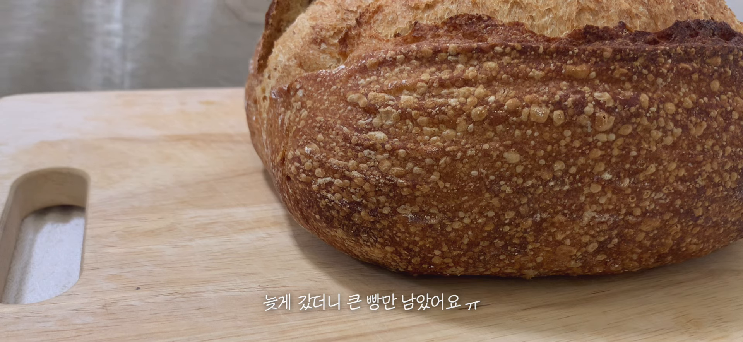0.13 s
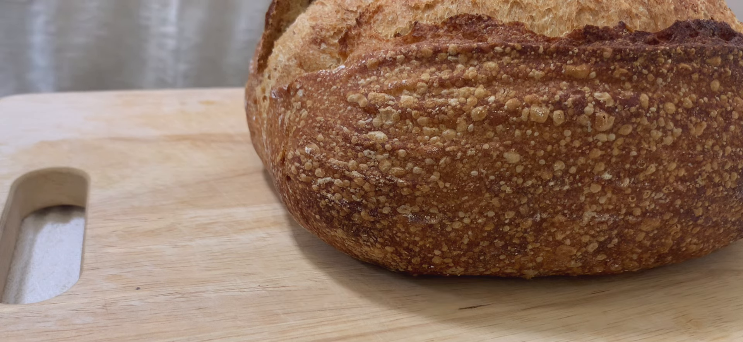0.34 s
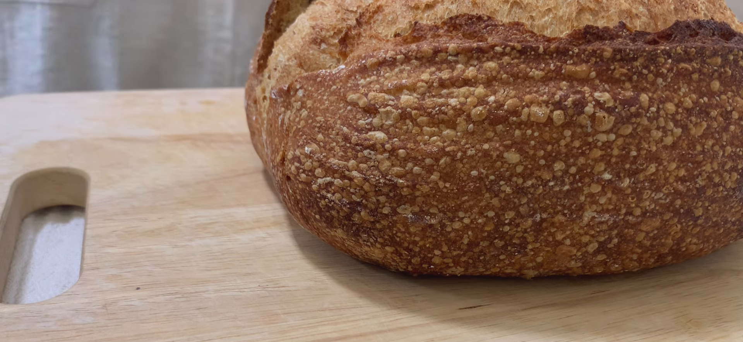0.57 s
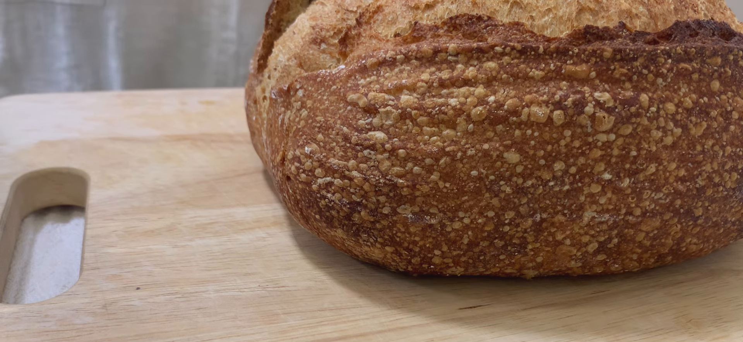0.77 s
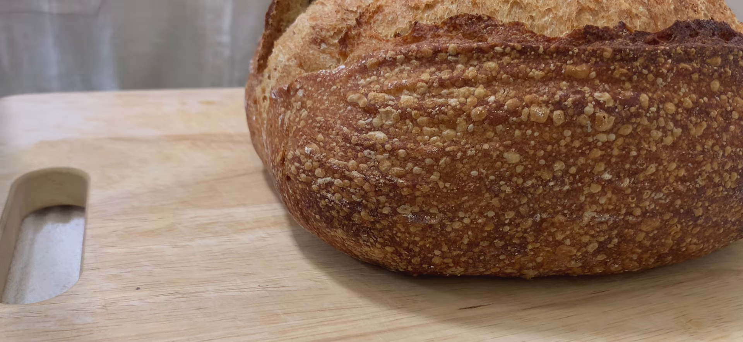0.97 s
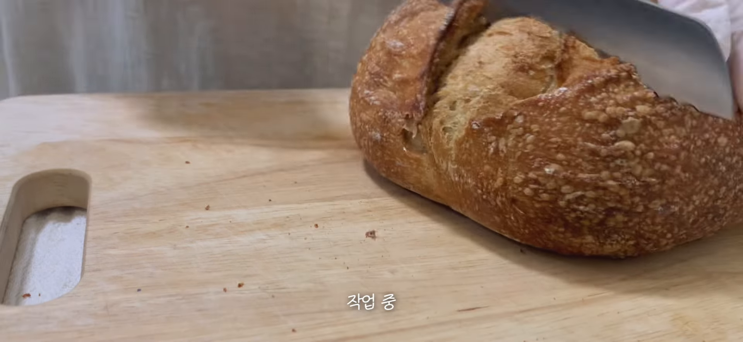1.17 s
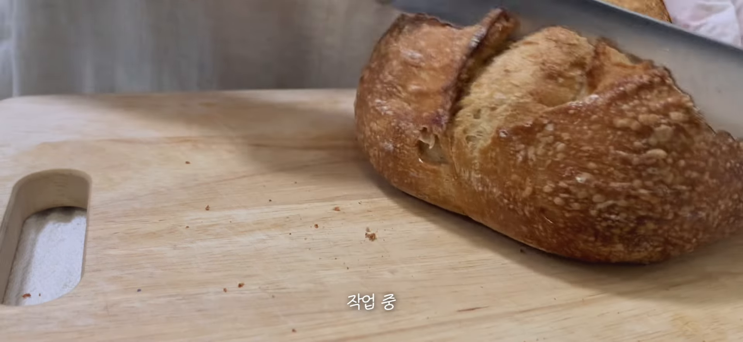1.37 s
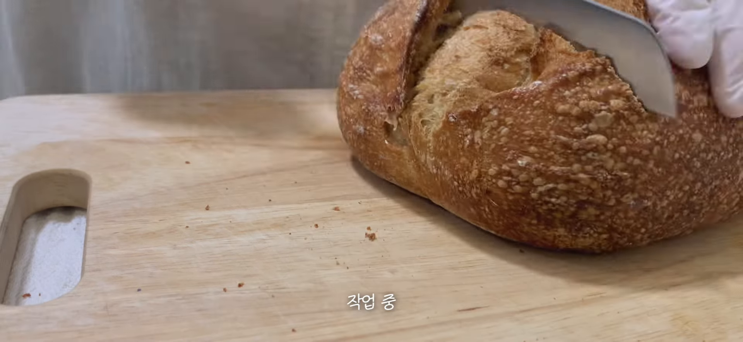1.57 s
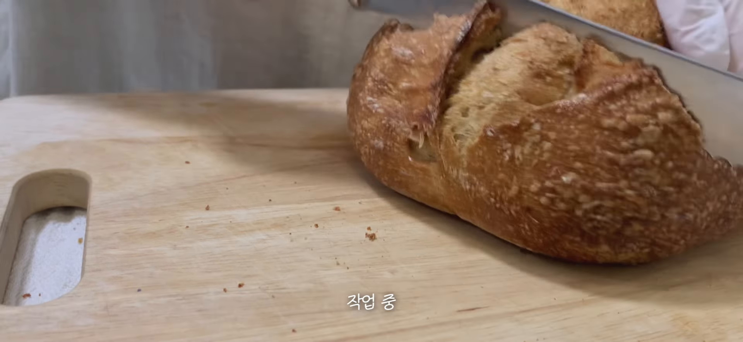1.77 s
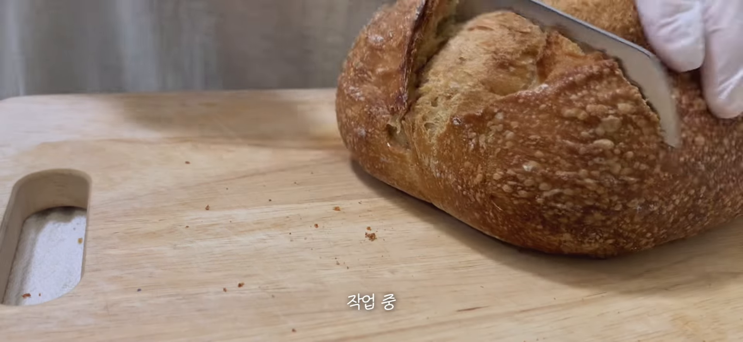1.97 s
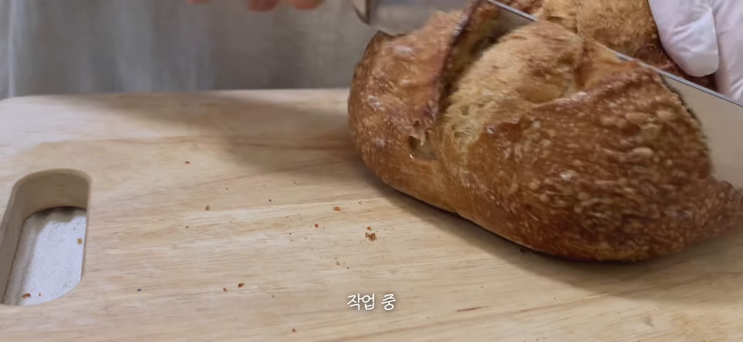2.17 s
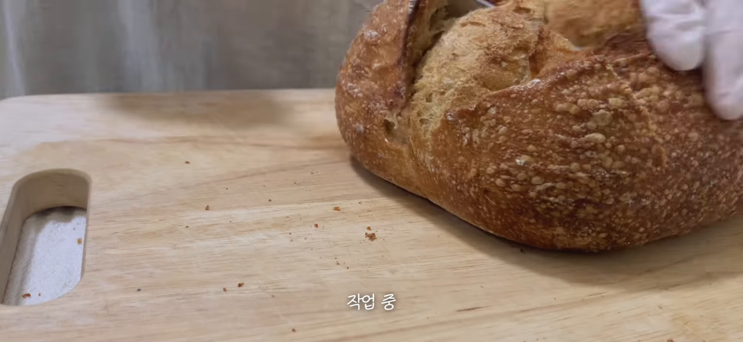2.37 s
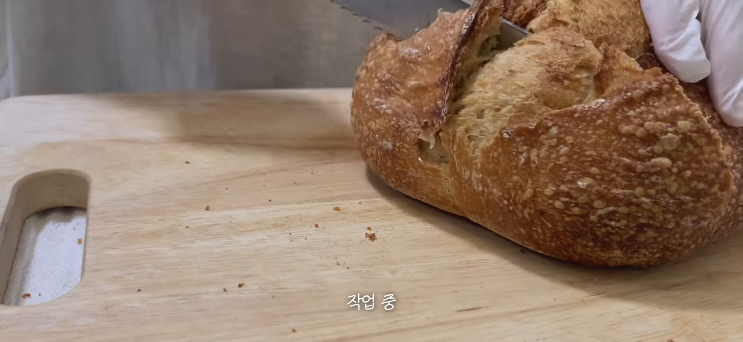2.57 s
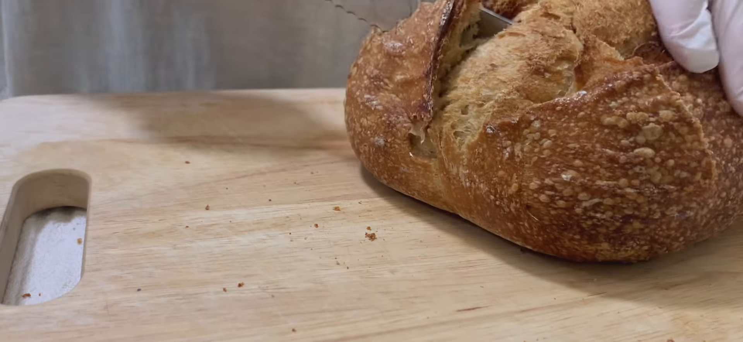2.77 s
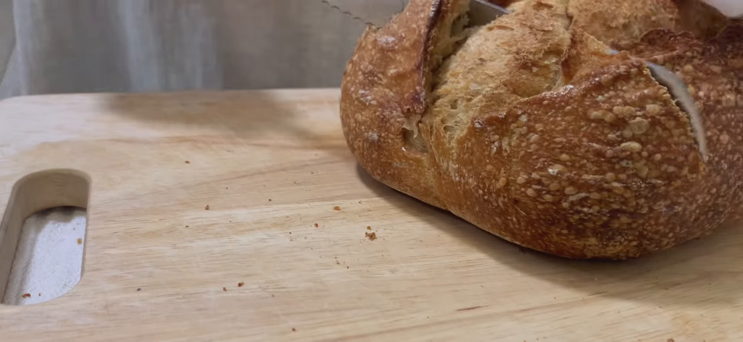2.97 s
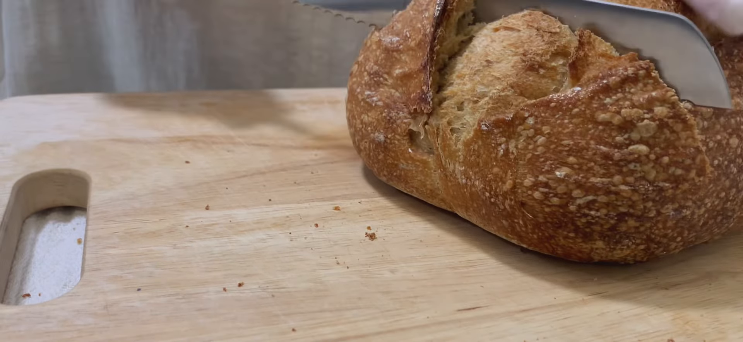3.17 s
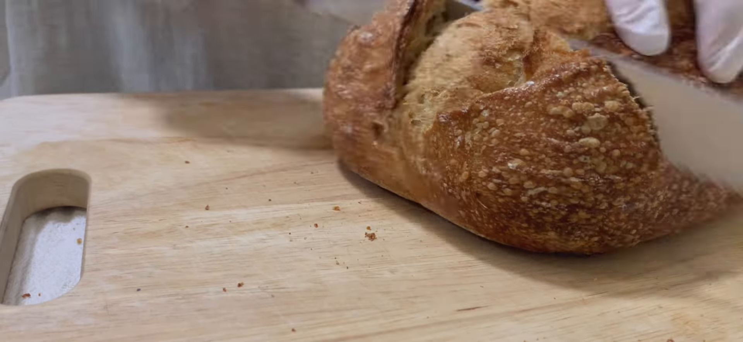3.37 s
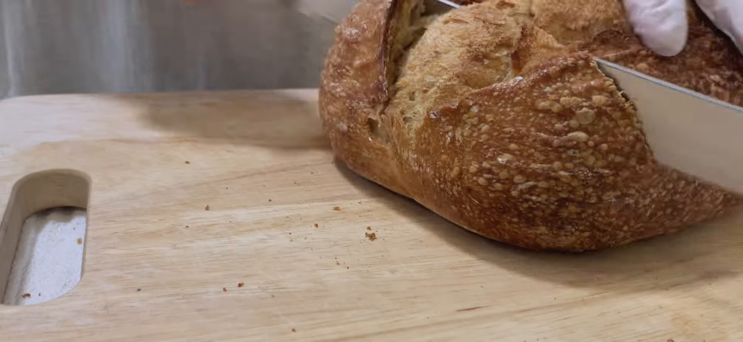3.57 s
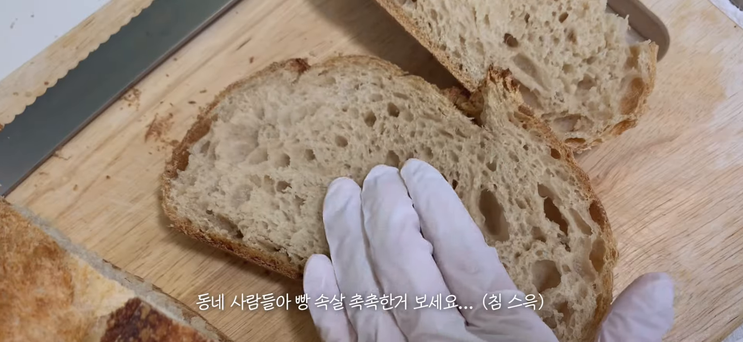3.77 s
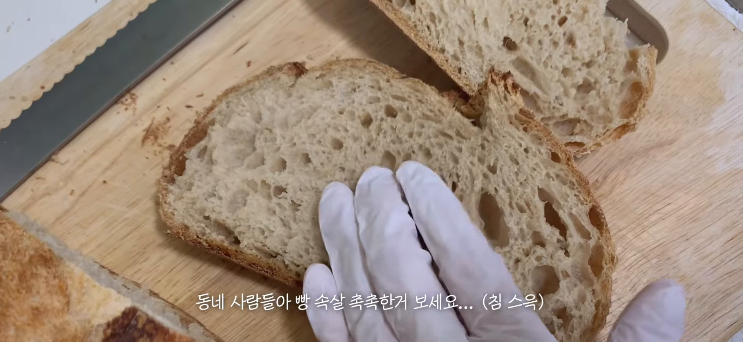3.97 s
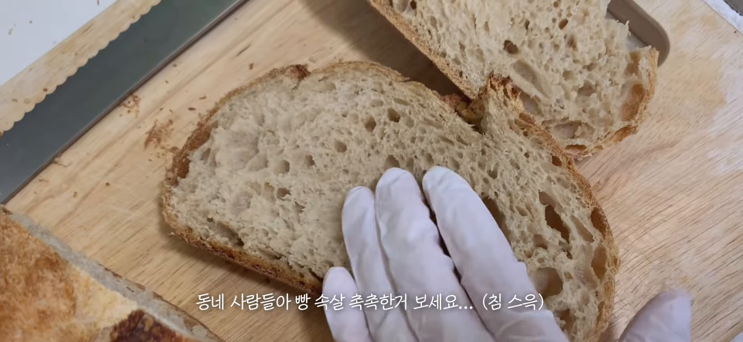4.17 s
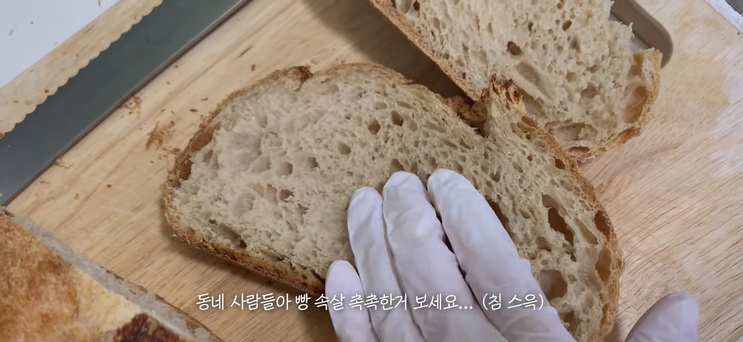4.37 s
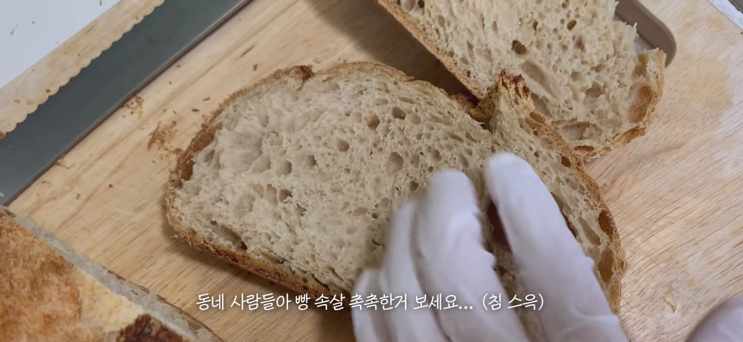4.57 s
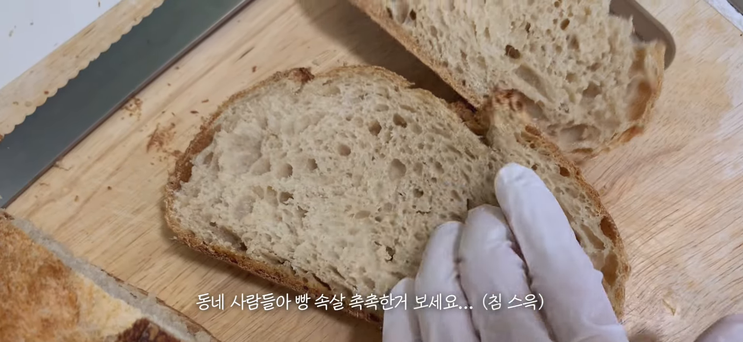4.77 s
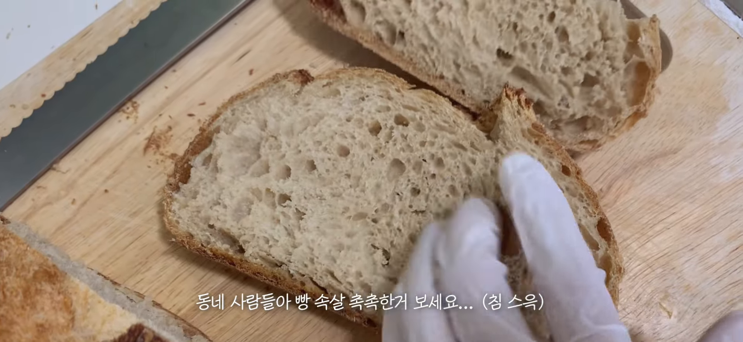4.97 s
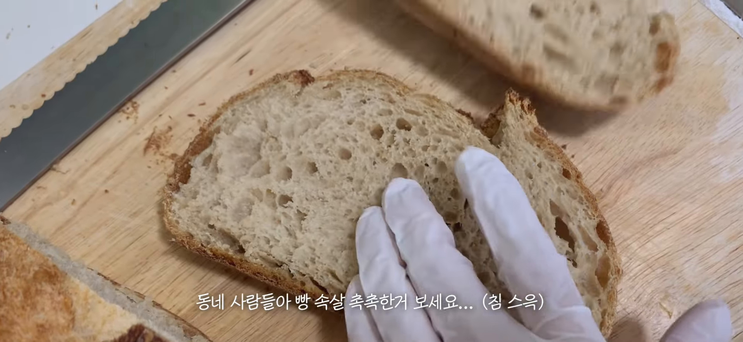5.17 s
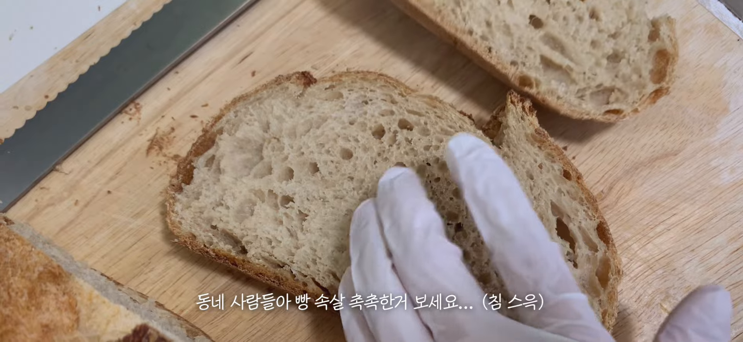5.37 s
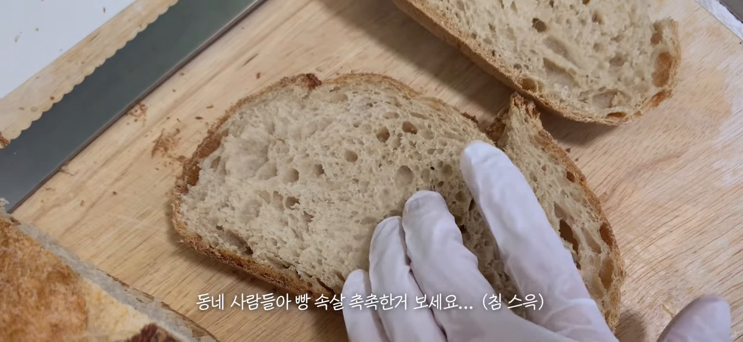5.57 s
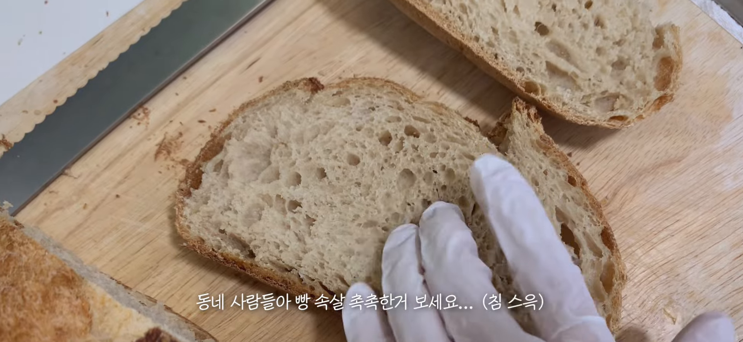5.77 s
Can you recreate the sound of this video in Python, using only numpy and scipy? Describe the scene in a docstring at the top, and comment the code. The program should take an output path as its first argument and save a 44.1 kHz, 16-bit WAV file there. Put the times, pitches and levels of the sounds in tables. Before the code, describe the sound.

A serrated knife saws rapidly through a crackly bread crust on a booming wooden board, then a gloved hand rubs, crackles and taps softly.

```python
"""In a kitchen, a serrated knife saws a hard loaf on a wooden board, close to a two-port phone microphone.
Grainy noise makes the crust's rasp and fizz, noise the board's boom, swelling sines its shudder when teeth catch.
Duller noise strokes come first from farther off; later a gloved hand presses the slice, with rubbing noise,
snaps of short noise bursts and finger taps through board resonances. Low noise rumbles throughout."""
import sys
import numpy as np
from scipy import signal
from scipy.fft import rfft, irfft, next_fast_len
from scipy.io import wavfile
from scipy.ndimage import uniform_filter1d

SR = 44100
rng = np.random.default_rng(int(sys.argv[2]) if len(sys.argv) > 2 else 0)


def put_to_file(sound):
    """Save the sound as 16-bit audio at rate SR, in the file named by the first command-line argument."""
    columns = np.atleast_2d(sound).T  # one column per channel
    safe = np.clip(columns, -1, 1)
    whole_steps = np.round(safe * 32767)
    wavfile.write(sys.argv[1], SR, whole_steps.astype(np.int16))


N = 256662

# strokes of the blade: (start [s], length [s], hardest point [0-1 of the stroke], brightest point [0-1],
# peakiness [factor on the power of speed], rasp [dB], fizz over rasp [dB], wood [dB], boom [dB])
STROKES = [(.98, .288, .12, .28, 1.72, -41.5, -4.5, -30, -29),
           (1.155, .284, .31, .33, 1.6, -40.5, -1.5, -25, -26),
           (1.368, .235, .5, .16, 1.68, -38.5, 2.5, -31.5, -32),
           (1.559, .258, .29, .23, .92, -41, -1, -29, -26), (1.777, .21, .4, .17, .9, -45, 3, -34, -34),
           (1.935, .286, .4, .44, 1.61, -41, 0, -29, -33), (2.164, .287, .3, .1, 1.32, -46, 4.5, -35, -34),
           (2.365, .226, .37, .44, 2.5, -45.5, 5, -53, -38), (2.5, .141, .52, .45, 2.5, -55.5, 1, -62, -46),
           (2.644, .129, .23, .26, 2.5, -57, -2.5, -64, -48),
           (2.7, .19, .9, .44, 1.07, -82.5, 15, -72, -52), (2.804, .183, .86, .43, 2.5, -66, 13, -72, -50),
           (2.91, .204, .9, .44, .94, -57, .5, -51, -40), (3.078, .22, .1, .35, 1.15, -60, 0, -53, -40),
           (3.22, .181, .77, .77, 2.5, -40, .5, -39, -34), (3.359, .17, .1, .23, 1.24, -44, -2.5, -39, -37),
           (3.476, .25, .53, .19, 1.49, -48, 6.5, -38.5, -37)]
# the close sawing is heard only between these times, breaking in and off mid-stroke: (start [s], end [s])
CLOSE_SAWING = (1.043, 3.662)
# soft rasp of glove, snap bodies and far strokes: (frequency [Hz], level per Hz [dB])
SOFT_RASP = [(400, -18), (900, -1.5), (1400, -1), (2300, -4.5), (3200, -10.5), (5000, -11), (8000, -49)]
# fizz of the glove, top of the snaps: (frequency [Hz], level per Hz [dB])
RUBBER_FIZZ = [(3000, -63), (5000, -12), (7000, -4), (9000, -6), (12000, -8.5), (16000, -22)]


def amp(db):
    """Amplitude factor of a level in dB."""
    return 10 ** (np.asarray(db) / 20)


def unit(x):
    """x scaled to an rms of 1."""
    return x / np.sqrt(np.mean(x ** 2) + 1e-20)


def along(points, hz):
    """Curve through (Hz, value) points on a log frequency axis."""
    f, v = np.transpose(points)
    return np.interp(np.log(hz + 1), np.log(f + 1), v)


def filtered(x, response):
    """x shaped by a complex response of frequency."""
    m = next_fast_len(N + 8192)
    return irfft(rfft(x, m) * response(np.fft.rfftfreq(m, 1 / SR)), m)[..., :N]


def modes(table):
    """Causal response of (Hz, width Hz, dB) resonances, summed with alternating sign."""
    def response(f):
        total = 0
        for k, (center, width, db) in enumerate(table):
            resonance = 1j * f * width / (center * center - f * f + 1j * f * width)
            total = total + (-1) ** k * amp(db) * resonance
        return total
    return response


def noise(spectrum, grain=1, patchy_db=0):
    """Two unrelated noises of joint rms 1 that share one grain envelope and patches of random gain."""
    z = signal.stft(grain * rng.standard_normal((2, N)), nperseg=512)[2]
    # smooth the random gains over frequency, then time
    field = uniform_filter1d(rng.standard_normal(z.shape[1:]), size=2, axis=0)
    field = uniform_filter1d(field, size=5, axis=1)
    pair = signal.istft(z * amp(patchy_db * unit(field)), nperseg=512)[1][:, :N]
    return unit(filtered(pair, lambda hz: amp(along(spectrum, hz))))


def grains(rate, spread_db, life, bed):
    """Envelope of many tiny breaks (rate per s), each dying in its life (s), over a steady bed."""
    chance, size = rng.random((2, N))
    breaks = (chance < rate / SR) * amp(-spread_db * np.log(1 - size))
    dying = signal.lfilter([1], [1, -np.exp(-1 / (life * SR))], breaks)
    return bed + unit(dying)


def friction(rasping, fizzing, grain, rasp, fizz, tearing=1):
    """Crumbs breaking: a mid rasp, lumpy where chunks tear, and a fizz above it."""
    rasp_layer = rasping * noise(rasp, tearing * grain, patchy_db=3.5)
    fizz_layer = fizzing * noise(fizz, grain, patchy_db=3.0)
    return rasp_layer + fizz_layer


def swells(rows):
    """Envelope of (peak s, dB, rise s, fall s) swells; rise and fall each span 20 dB."""
    t = np.arange(0, N + 20, 20) / SR
    energy = 0
    for s, db, rise, fall in rows:
        away = np.where(t < s, (s - t) / rise, (t - s) / fall)
        energy = energy + amp(db - 20 * away) ** 2
    return np.interp(np.arange(N) / SR, t, np.sqrt(energy))


def bursts(rows, t60s):
    """A noise burst with a sudden start and exponential decay at each (s, dB)."""
    out, t = np.zeros((2, N + SR)), np.arange(SR // 4) / SR
    for (s, db), t60 in zip(rows, t60s):
        burst = amp(db - 60 * t / t60) * rng.standard_normal((2, len(t)))
        out[:, round(s * SR):][:, :len(t)] += burst
    return out[:, :N]


def kitchen():
    """Room rumble that swells when the table is pushed, over a steady faint hiss."""
    # the table is pushed and rumbles: (peak time [s], level [dB])
    pushes = [(1.12, -35), (1.24, -33), (1.35, -35), (1.64, -34), (1.77, -30), (2.05, -31), (2.17, -32),
              (2.45, -37), (3.04, -39), (3.35, -37), (3.47, -33), (4.95, -45), (5.3, -39), (5.63, -41)]
    # deep rumble, low rumble and hiss: (frequency [Hz], level per Hz [dB])
    deep_spectrum, low_spectrum, hiss_spectrum = [(15, -38), (28, 4), (54, 22), (75, 13.5), (100, -43)], [(60, -2.5), (100, 1), (130, -4.5),
                                                                (230, -19), (270, -19), (360, -18.5),
                                                                (450, -29), (830, -32.5), (1100, -43),
                                                                (1450, -40.5), (2200, -56.5), (4000, -69)], [(800, -14), (2000, 3),
                                                                             (4500, 2.5), (6800, -3),
                                                                             (9000, -4), (16000, -11)]
    push_s = .17  # rise and fall over 20 dB
    room_deep_db, room_low_db, hiss_db = -50, -46.5, -83.5
    first_deeper_db = 4  # extra deep rumble where the phone first lies
    before = np.arange(N) < CLOSE_SAWING[0] * SR
    resting = amp(room_deep_db + first_deeper_db * before)
    pushed = swells([(s, db, push_s, push_s) for s, db in pushes])
    deep = np.hypot(resting, pushed) * noise(deep_spectrum)
    low = amp(room_low_db) * noise(low_spectrum, patchy_db=1.5)
    return deep + low + amp(hiss_db) * noise(hiss_spectrum, patchy_db=3.5)


def far_strokes():
    """Distant strokes rise quickly and fade slowly; the fizz spreads wider than the rasp."""
    # distant strokes: (peak time [s], rasp [dB], fizz over rasp [dB])
    distant_strokes = [(.437, -58, -12), (.691, -52, -10.5), (.912, -54.5, -7.5)]
    # fizz heard from afar: (frequency [Hz], level per Hz [dB])
    distant_fizz = [(2500, -13), (4000, -3), (6500, 2.5), (9000, 1), (12000, -6), (16000, -1)]
    rasp_rise_s, rasp_fall_s = .045, .15  # over 20 dB
    fizz_rise_s, fizz_fall_s = .086, .21  # over 20 dB
    rasp = swells([(s, db, rasp_rise_s, rasp_fall_s) for s, db, _ in distant_strokes])
    fizz = swells([(s, db + bright_db, fizz_rise_s, fizz_fall_s) for s, db, bright_db in distant_strokes])
    before = np.arange(N) < CLOSE_SAWING[0] * SR
    grain = grains(900, spread_db=2, life=.003, bed=2.5)
    return before * friction(rasp, fizz, grain, SOFT_RASP, distant_fizz)


def glove():
    """Each rub on the crumb swells and fades; its brightness sets the level of rubber fizz."""
    # the glove rubs the crumb: (peak time [s], rub [dB], fizz over rub [dB],
    # rise over 20 dB [s], fall over 20 dB [s])
    rubs = [(3.975, -59, 0, .04, .065), (4.016, -60, 6, .04, .055), (4.106, -74, 1, .028, .052),
            (4.468, -58, 4, .045, .08), (4.711, -73, -2.5, .04, .06), (4.794, -55, -20, .025, .112),
            (4.857, -80, 10, .038, .055), (4.981, -60, 6, .049, .045), (5.129, -48.5, 4.5, .068, .047),
            (5.201, -64, -11, .068, .1), (5.317, -68, -3.5, .025, .1), (5.354, -60.5, 5.5, .03, .035),
            (5.455, -77, 7, .035, .036), (5.637, -61.5, 7, .024, .036), (5.736, -76, 9, .013, .034)]
    rub = swells([(s, db, rise, fall) for s, db, _, rise, fall in rubs])
    fizz = swells([(s, db + bright_db, rise, fall) for s, db, bright_db, rise, fall in rubs])
    grain = grains(700, spread_db=2.5, life=0.0022, bed=0.87)
    return friction(rub, fizz, grain, SOFT_RASP, RUBBER_FIZZ)


def taps():
    """Fingers tap the board: soft noise blows ring through its middle modes."""
    # finger taps: (time [s], level before the modes and make-up gain [dB], decay by 60 dB [s])
    finger_taps = [(3.091, -58, 0.03), (4.51, -41.5, 0.046), (4.785, -30, 0.06), (5.118, -30, 0.062),
                   (5.149, -44, 0.033), (5.206, -39.5, 0.027), (5.299, -42, 0.04)]
    # middle modes of the board: (frequency [Hz], width [Hz], relative level [dB])
    board_modes = [(338, 38, -0.5), (480, 30, 3), (795, 310, -13), (1390, 130, -11), (2320, 450, -25)]
    blows = bursts([row[:2] for row in finger_taps], [row[2] for row in finger_taps])
    return amp(16) * filtered(blows, modes(board_modes))  # make-up gain


def snaps():
    """Single breaks of crust and glove: a crisp top and a longer, duller body."""
    # snaps: (time [s], top level before filtering [dB], body over top before filtering [dB])
    breaks = [(1.174, -28.5, -13), (1.5803, -30, -12), (2.0093, -28, -2), (2.0632, -24.5, -8),
              (2.581, -33, -6), (3.126, -41, -4), (3.1678, -37, -13), (3.9769, -50, -17),
              (4.0133, -38, -16), (4.4827, -41, -22), (4.7776, -49, 0), (4.9434, -51, -8),
              (4.9846, -43, -17), (5.0459, -48, -7), (5.075, -41, -4), (5.091, -45, -11),
              (5.0967, -35, -18), (5.1104, -31, -5), (5.1171, -23, -10), (5.3577, -36, -13.5),
              (5.6386, -34.5, -16)]
    s, db, body_db = np.transpose(breaks)
    top = bursts(zip(s, db), np.full(len(s), .008))
    body = bursts(zip(s, db + body_db), np.full(len(s), .02))
    crisp = filtered(top, lambda hz: amp(along(RUBBER_FIZZ, hz) + 3.5))
    dull = filtered(body, lambda hz: amp(along(SOFT_RASP, hz) + 6.5))
    return crisp + dull


def catches():
    """Each catch of the teeth swells on the board's lowest mode and is then damped."""
    # the teeth catch and the board swings: (time [s], level before a 1.5 dB lift [dB], pitch [Hz], rise [s])
    shudders = [(1.049, -23, 120, .014), (1.093, -15, 109.5, .018), (1.239, -8, 102.2, .017),
                (1.298, -14, 118, .0085), (1.457, -29, 144, .016), (1.504, -20, 120, .012),
                (1.643, -9, 109, .013), (1.699, -26, 120, .022), (1.852, -28, 123.5, .018),
                (2.023, -16.5, 105.4, .0285), (2.071, -13.5, 104.5, .022), (3.344, -22, 95.8, .028),
                (3.414, -28, 96.9, .015), (3.619, -33, 95, .022)]
    t60_s = .1  # from the peak
    out, t = np.zeros(N + SR), np.arange(SR // 2) / SR
    for s, db, hz, rise in shudders:
        attack = np.sin(np.pi / 2 * np.clip(t / rise, 0, 1)) ** 2
        damping = amp(-60 * (np.maximum(t - rise, 0) / t60_s) ** 1.33)
        out[round(s * SR):][:len(t)] += amp(db + 1.5) * attack * damping * np.sin(2 * np.pi * hz * t)
    return np.array([out[:N], 0.089 * out[:N]])  # mostly common to both ports


def sawing(db, tops, power):
    """Each stroke speeds up to its top and slows to the turn; amplitude is speed to a power."""
    resting_db = -77  # the blade lying in the cut
    t = np.arange(0, N + 20, 20) / SR
    energy = amp(resting_db) ** 2
    for (s, length, *_), level, top, p in zip(STROKES, db, np.clip(tops, .05, .95), power):
        speed = np.sin(np.interp((t - s) / length, [0, top, 1], [0, np.pi / 2, np.pi]))
        energy = energy + (amp(level) * np.abs(speed) ** p) ** 2
    close = (t > CLOSE_SAWING[0]) * (t < CLOSE_SAWING[1])
    return np.interp(np.arange(N) / SR, t, np.sqrt(energy) * close)


def knife():
    """The same breaking crust rasps, drives the board beneath the loaf and bows the blade."""
    # rasp and fizz of the crust: (frequency [Hz], level per Hz [dB])
    crust_rasp, crust_fizz = [(300, 2), (700, -1), (1100, -3), (1450, -1.5), (1950, 0), (2500, -3),
                              (3200, -14.5), (4600, -6), (6500, -25), (9000, -49)], [(2500, -3), (4500, -4.5), (6500, -3.5), (9000, -1), (12000, -4),
                                            (16000, -11)]
    # wood knock and boom of the board: (frequency [Hz], level per Hz [dB])
    wood_spectrum, boom_spectrum = [(100, -23), (168, 4.5), (225, 0.5), (275, -14.5), (320, -3.5), (347, 3),
                                    (385, -18.5), (495, -8.5), (620, -21), (825, -14), (1100, -29),
                                    (1600, -82)], [(45, -25), (70, -13.5), (92, -2), (108, 6), (125, 6),
                                                  (152, -8.5), (200, -66), (300, -75)]
    # the blade sings while one stroke bows it: (peak time [s], level [dB], rise and fall over 20 dB [s])
    singing = (1.476, -35, .08)
    # resonances of the blade: (frequency [Hz], width [Hz], relative level [dB])
    blade_modes = [(1705, 43, 2), (2040, 100, 9), (1980, 41, -12), (2580, 110, -5), (4950, 120, -6)]
    # amplitude grows as speed to these powers, times each stroke's peakiness for all
    fizz_power, rasp_power, wood_power, boom_power = 1.5, 1.33, 2.2, .7

    tearing = grains(90, spread_db=2.5, life=.005, bed=1.4)  # chunks of crust give way
    grain = grains(900, spread_db=3.0, life=0.0013, bed=3.5)
    _, _, hard, bright, peaky, db, bright_db, wood_db, boom_db = np.transpose(STROKES)
    wood = sawing(wood_db, hard, wood_power * peaky) * noise(wood_spectrum, tearing * grain, patchy_db=2.5)
    boom = sawing(boom_db, hard, boom_power * peaky) * noise(boom_spectrum)
    bowed = unit(filtered(tearing * rng.standard_normal((2, N)), modes(blade_modes)))
    blade = swells([singing + singing[-1:]]) * bowed
    rasp = sawing(db, hard, rasp_power * peaky)
    fizz = sawing(db + bright_db, bright, fizz_power * peaky)
    return friction(rasp, fizz, grain, crust_rasp, crust_fizz, tearing) + wood + boom + blade


def ports(pair, alike):
    """Common and scattered parts reach both ports; treble leads at the right, bass leans there till sawing ends."""
    # lead of the right port: (frequency [Hz], phase [rad])
    right_lead = [(0, 0), (2000, 0.74), (3300, 3), (4650, 6.5), (16500, 22)]
    # left over right until the close sawing ends: (frequency [Hz], level difference [dB])
    left_lean = [(60, -3), (200, -6), (360, -1.5), (600, 1), (3200, 0), (4500, -4), (8000, 0)]

    def shares(hz):
        """Shares of the two parts that give the ports this likeness."""
        turn = np.arccos(np.clip(along(alike, hz), -1, 1)) / 2
        return np.array([np.cos(turn), np.sin(turn)])

    common, scattered = filtered(pair, shares)
    side = np.array([[1], [-1]])  # left, right
    level = filtered(common + side * scattered,
                     lambda hz: np.exp(-.5j * side * np.interp(hz, *np.transpose(right_lead))))
    leaning = filtered(level, lambda hz: amp(side * along(left_lean, hz) / 2))
    return np.where(np.arange(N) < CLOSE_SAWING[1] * SR, leaning, level)


def scene():
    """Far strokes and kitchen reach the ports as room sound, the loaf, board and glove as near sound."""
    # likeness of the two ports for near and room sound: (frequency [Hz], correlation [0-1])
    near_alike, room_alike = [(100, 0.92), (400, 0.41), (2000, 0.43), (5000, 0), (7500, 0.79), (10000, 1)], [(100, 1), (300, 0.35), (700, 0), (5000, .25),
                                                  (7500, 0.43), (10000, 1)]
    room = far_strokes() + kitchen()
    near = glove() + taps() + snaps() + catches() + knife()
    return ports(near, near_alike) + ports(room, room_alike)


def record(dry):
    """The phone cuts the deepest bass steeply and keeps nothing above its band limit."""
    top_hz, bottom_hz = 15830, 44.4
    return filtered(dry, lambda hz: (hz < top_hz) / (1 + (bottom_hz / (hz + 1)) ** 4))


dry = scene()
out = record(dry)
put_to_file(out)
```